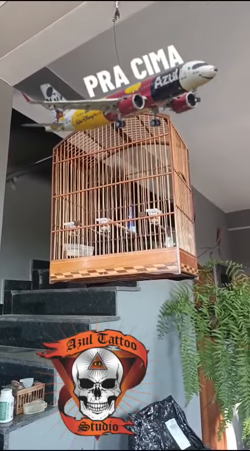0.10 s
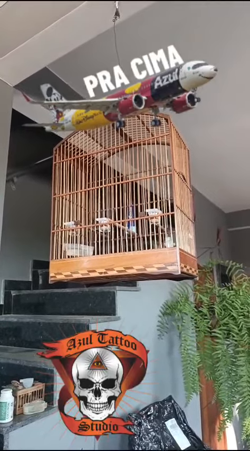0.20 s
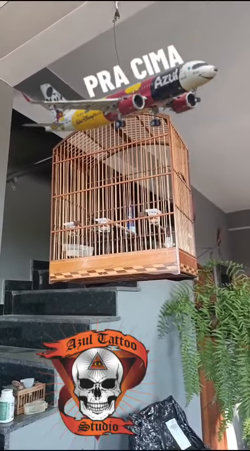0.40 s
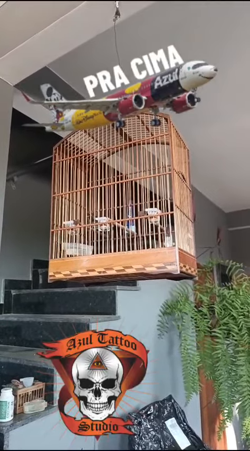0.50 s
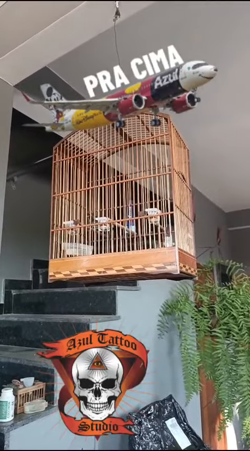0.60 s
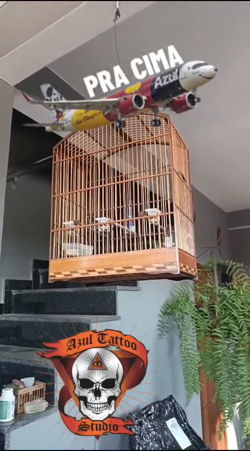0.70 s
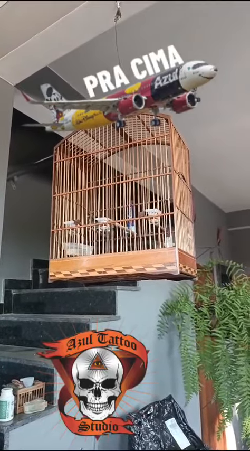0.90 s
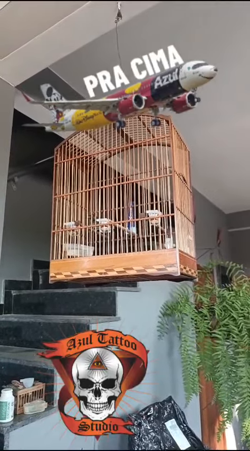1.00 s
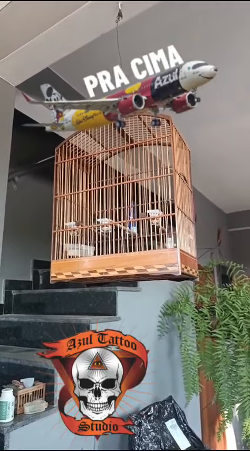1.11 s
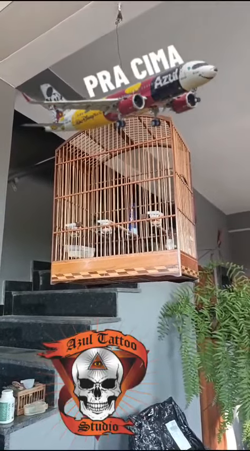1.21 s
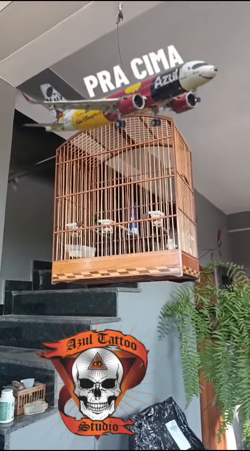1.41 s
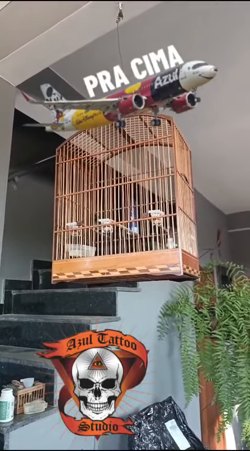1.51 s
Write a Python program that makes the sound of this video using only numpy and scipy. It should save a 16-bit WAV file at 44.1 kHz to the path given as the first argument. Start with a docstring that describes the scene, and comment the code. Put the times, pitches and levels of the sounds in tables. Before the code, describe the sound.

A small caged bird sings close by: thin, very high falling chips from 0 to 0.2 s, a fast two-voiced buzz from 0.22 s narrowing to a whistle near 0.36 s, and a steep drop at 0.40-0.45 s. The hard room rings afterward. Tiny cage taps fall at 0.05 and 0.2 s. Farther birds chirp softly, clearest at 0.7-0.9 s, over low rumble; a faint chip comes at 1.55 s.

```python
"""Indoors, in a hard ringing room with low outdoor rumble: a small caged bird sings near a phone.
Gliding near-sines make thin falling chips, a two-voiced trilled buzz that narrows to a whistle, and a quick drop.
Wall echoes and decaying noise ring after the song; two tiny noise taps sound in the cage.
Other birds, softer gliding notes in the same room, call farther off over filtered-noise air."""
import sys
import numpy as np
from scipy import signal
from scipy.fft import rfft, irfft, next_fast_len
from scipy.io import wavfile
from scipy.ndimage import uniform_filter1d

SR = 44100
rng = np.random.default_rng(int(sys.argv[2]) if len(sys.argv) > 2 else 0)


def voltage_ratio(level):
    """Linear amplitude factor for a level in decibels (scalar or array-like)."""
    return 10 ** (np.asarray(level, float) / 20)


def pcm_store(signal):
    """Save signal as 16-bit PCM."""
    levels = np.round(np.clip(np.atleast_2d(signal), -1, 1) * 32767)
    wavfile.write(sys.argv[1], SR, levels.astype(np.int16).T)


N = 68355
PREROLL = int(.3 * SR)  # samples played before the start, so the room already rings

# outdoor air spectrum, overall level set by AIR_DB: (frequency [Hz], relative density [dB])
AIR_SPECTRUM = [(15, -41), (25, -25), (108, 0.5), (180, -1.5), (335, -9.5), (714, -14.5), (1100, -17),
                (2110, -18.5), (3340, -24), (4600, -29.5), (6200, -38.5), (8000, -43.5), (12000, -47.5),
                (16000, -41)]
# stereo spread of the air: (frequency [Hz], side minus mid [dB])
AIR_SPREAD = [(60, -19), (110, -16.5), (200, -12.5), (380, -6.5), (700, -2.5), (1290, -1), (2380, -0.5),
              (4400, -1), (8120, -0.5), (15000, 0)]
# low hums in the air: (frequency [Hz], width [Hz], lift over the rumble [dB])
AIR_HUMS = [(61, 4.6, 8.5), (92, 5, 4.5), (162, 16, 3)]
AIR_DB, AIR_RISE_DB_PER_S = -50.5, 0.5

# room decay by band: (frequency [Hz], early T60 [s], late T60 [s], late level re early [dB])
ROOM_BANDS = [(2000, 0.69, 1.8, -9.5), (4000, 0.69, 0.97, -9), (6000, 0.47, 0.89, -10),
              (7560, .5, 0.83, -4.5), (11000, 0.3, 0.77, -14.5), (16000, 0.41, 0.6, -5)]
# nearest walls: (delay [s], left gain [dB], right gain [dB])
WALL_ECHOES = [(.007, -11, -13), (.016, -11.5, -11.5), (.021, -11, -13), (.031, -11, -22), (.052, -11, -12),
               (.075, -9, -15)]
FIRST_ECHO_S, BUILD_S = 0.0033, 0.0078
NEAR_WET_DB, FAR_WET_DB, FAR_DIRECT_DB = 5.5, 8.5, -8

# microphone colour on the near sounds: (frequency [Hz], gain [dB])
MIC_COLOUR = [(3000, 5), (6000, -2), (9000, -0.5), (11200, -5.5), (13000, 2.5), (15300, 1.5)]
# balance of the two phone ports on the near sounds: (frequency [Hz], left minus right [dB])
PORT_BALANCE = [(1000, -7), (2000, -13), (4000, -2), (8000, -9.5), (11000, 1), (14000, 3.5)]
LEFT_LEAD_S = 0.00012  # the near direct sound reaches the left port first

# Source levels below are ahead of the room, the ports and any trill or flutter.
# calls farther off: (time [s], length [s], start pitch [Hz], end pitch [Hz], level [dB])
FAR_CALLS = [(-.06, 0.057, 4356, 2794, -57.5), (.02, 0.039, 3090, 3020, -62.5),
             (.04, 0.053, 4300, 3804, -62.5), (.69, 0.041, 5850, 5670, -44.5),
             (.72, 0.061, 5720, 4455, -49), (.745, 0.052, 4387, 3640, -46.5),
             (.775, 0.013, 5500, 4850, -60), (.805, 0.039, 4640, 4000, -52.5),
             (.845, 0.019, 4000, 4000, -50.5), (.88, 0.0885, 2912, 2790, -63), (1.03, .04, 9570, 7680, -79),
             (1.1, 0.092, 6160, 5000, -74.5), (1.15, 0.049, 6980, 6800, -72),
             (1.37, 0.061, 7440, 4600, -74.5), (1.21, .03, 6000, 4890, -59), (1.245, .055, 5400, 3500, -66),
             (1.345, .02, 3750, 3710, -81), (1.43, 0.027, 6750, 5800, -62.5),
             (1.455, .03, 6100, 4810, -63.5), (1.495, 0.051, 3197, 3750, -68.5)]
# taps in the cage: (time [s], level [dB])
CAGE_TICKS = [(.049, -44), (.2, -44)]
# falling chips around the song: (time [s], length [s], start pitch [Hz], end pitch [Hz], level [dB])
CHIP_NOTES = [(-.057, .007, 10840, 8800, -46.5), (-.016, .007, 10810, 9000, -39),
              (.025, 0.0086, 9970, 8860, -40.5), (.066, .007, 11000, 8920, -37),
              (.107, .007, 11890, 8790, -31), (.146, .007, 11000, 8850, -41.5),
              (.206, 0.0081, 12960, 10000, -28.5), (1.545, .007, 10500, 9060, -58.5)]
# upper voice, buzz into whistle: (time [s], pitch [Hz], trill swing [Hz], level [dB])
UPPER_VOICE = [(.223, 9400, 902, -71.5), (.228, 9320, 904, -33.5), (.265, 8920, 1189, -31),
               (.31, 8485, 1292, -34), (.34, 8310, 1391, -30.5), (.355, 7810, 300, -25.5),
               (.375, 7760, 80, -27.5), (.398, 7620, 39.1, -28.5), (.404, 7660, 40, -63.5)]
# lower voice of the buzz: (time [s], pitch [Hz], trill swing [Hz], level [dB])
LOWER_VOICE = [(.223, 6610, 400, -80), (.228, 6770, 400, -41.5), (.265, 7043, 700, -28),
               (.31, 7290, 800, -45), (.336, 7030, 300, -26), (.348, 6840, 300, -59)]
# closing drop: (time [s], pitch [Hz], trill swing [Hz], level [dB])
CLOSING_DROP = [(.401, 7350, 29.93, -55), (.4035, 6920, 594, -22), (.407, 6000, 298, -21.5),
                (.417, 6620, 100, -18.5), (.4205, 6035, 100, -46), (.424, 5790, 150, -20),
                (.43, 5295, 149, -19), (.437, 4603, 150, -19.5), (.442, 4000, 101, -28),
                (.446, 3800, 30, -72.5)]
# octave overtone by part: name: level re fundamental [dB]
OCTAVE_DB = {"upper": -8.5, "lower": -12, "drop": -24.5, "chip": -33}
TRILL_HZ, TRILL_WOBBLE, PULSE_DEPTH_PER_KHZ = 203, 0.044, 0.92  # depth per kHz of trill swing
PITCH_JITTER_HZ, FLUTTER_DB = 59.5, 2.5
SUM_TONE_DB, HALF_TONE_DB = 11, -37


def table(rows, hz):
    """Read (frequency, value) rows on a log-frequency axis."""
    rows = np.array(rows, float)
    return np.interp(np.log(np.maximum(hz, 1)), np.log(rows[:, 0]), rows[:, 1])


def shape(x, gain):
    """Filter by a gain that is a function of frequency."""
    size = next_fast_len(x.shape[-1])
    hz = np.arange(size // 2 + 1) * SR / size
    return irfft(rfft(x, size) * gain(hz), size)[..., :x.shape[-1]]


def clock():
    """Time in s, negative through the preroll."""
    return (np.arange(N + PREROLL) - PREROLL) / SR


def walk(rate):
    """Random drift: levels held 1 / rate s, then smoothed twice."""
    hold, size = max(int(SR / rate), 1), N + PREROLL
    steps = np.repeat(rng.standard_normal(size // hold + 1), hold)[:size]
    return 1.3 * uniform_filter1d(uniform_filter1d(steps, hold), hold)


def whistle(hz, level, octave_db, half_db=-99):
    """A near sine with an octave overtone and an optional tone an octave below."""
    phase = 2 * np.pi * np.cumsum(hz) / SR + 2 * np.pi * rng.random()
    octave = voltage_ratio(octave_db) * np.sin(2 * phase) * (2 * hz < .45 * SR)  # mute it close to Nyquist
    half = voltage_ratio(half_db) * np.sin(phase / 2)
    return np.sqrt(2) * level * (np.sin(phase) + octave + half)


def notes(rows, bend, swell, octave_db, warble_hz):
    """Short gliding notes with rounded ends; bend over 1 glides fastest at first, swell over 1 leans late."""
    t, out, warble = clock(), 0, warble_hz * walk(150)
    for start, length, start_hz, end_hz, db in rows:
        u = np.clip((t - start) / length, 0, 1)
        hz = end_hz + (start_hz - end_hz) * (1 - u) ** bend + warble
        envelope = np.minimum(2 * np.sin(np.pi * u ** swell), 1)
        out = out + whistle(hz, voltage_ratio(db) * envelope, octave_db)
    return out


def air():
    """Outdoor rumble, hums and hiss: slowly swelling noise, mostly shared by both ports in the bass."""
    def colour(hz):
        hums = sum(db * np.exp(-((hz - f) / width) ** 2) for f, width, db in AIR_HUMS)
        return table(AIR_SPECTRUM, hz) + hums

    mid = shape(rng.standard_normal(N), lambda hz: voltage_ratio(colour(hz)))
    side = shape(rng.standard_normal(N), lambda hz: voltage_ratio(colour(hz) + table(AIR_SPREAD, hz)))
    rise_db = np.arange(N) / SR * AIR_RISE_DB_PER_S
    level = voltage_ratio(AIR_DB + rise_db + walk(2.8)[:N]) / np.std(mid)
    return level * np.array([mid + side, mid - side])


def room(x, wet_db):
    """Dense echoes, different at each port; each band fades fast at first, then slowly."""
    t, tail = np.arange(N) / SR, 0
    centres = np.array(ROOM_BANDS)[:, 0]
    noise = rng.standard_normal((2, N))
    for k, (_, early_s, late_s, late_db) in enumerate(ROOM_BANDS):
        only_this = np.arange(len(centres)) == k
        band = shape(noise, lambda f: np.sqrt(table(np.c_[centres, only_this], f)))
        tail = tail + band * np.hypot(voltage_ratio(-60 * t / early_s), voltage_ratio(late_db - 60 * t / late_s))
    tail = tail * np.clip((t - FIRST_ECHO_S) / BUILD_S, 0, 1)
    tail *= voltage_ratio(wet_db) / np.sqrt(np.sum(tail ** 2) / 2)  # wet level sets the mean energy of the two tails
    return signal.fftconvolve(x[None], tail, axes=1)[:, :len(x)]


def walls(x):
    """Single delayed echoes off the nearest walls."""
    out = 0
    for delay, left_db, right_db in WALL_ECHOES:
        gain = voltage_ratio(np.array([[left_db], [right_db]]))
        out = out + gain * np.roll(x, int(delay * SR)) * (clock() > delay - .3)  # gate the wrapped end
    return out


def far_birds():
    """Softer, evenly gliding calls with a random warble, direct and through the room."""
    calls = notes(FAR_CALLS, bend=1, swell=1, octave_db=-33, warble_hz=110)
    return voltage_ratio(FAR_DIRECT_DB) * calls + room(calls, FAR_WET_DB)


def ticks():
    """Tiny taps in the cage: noise bursts that die at once, thinned in the bass."""
    t, t60_s = clock(), 0.033
    env = sum(voltage_ratio(db - 60 * np.clip(t - s, 0, 1) / t60_s) * (t > s) for s, db in CAGE_TICKS)
    return shape(env * rng.standard_normal(len(t)), lambda hz: np.clip(hz / 1500, 0, 1))


def voice(rows, trill, octave_db, half_db=-99):
    """One side of the syrinx: the trill swings the pitch and pulses the level, loudest as pitch climbs."""
    t, rows = clock(), np.array(rows, float)
    hz, swing_hz, db = (np.interp(t, rows[:, 0], rows[:, k]) for k in (1, 2, 3))
    depth = np.clip(PULSE_DEPTH_PER_KHZ * swing_hz / 1000, 0, 1)
    sounding = (t > rows[0, 0]) * (t < rows[-1, 0])
    level = voltage_ratio(db + FLUTTER_DB * walk(500)) * sounding * (1 + depth * np.cos(trill))
    pitch = hz + swing_hz * np.sin(trill) + PITCH_JITTER_HZ * walk(400)
    return whistle(pitch, level, octave_db, half_db)


def bird():
    """Chips, buzz, whistle and drop; the two voices of the buzz multiply into a sum tone."""
    trill = 2 * np.pi * np.cumsum(TRILL_HZ * (1 + TRILL_WOBBLE * walk(60))) / SR
    upper = voice(UPPER_VOICE, trill, OCTAVE_DB["upper"], HALF_TONE_DB)
    lower = voice(LOWER_VOICE, trill + 1.3, OCTAVE_DB["lower"])
    sum_tone = shape(upper * lower, lambda hz: (hz > 11000) * (hz < 19000))
    chips = notes(CHIP_NOTES, bend=2.6, swell=1.3, octave_db=OCTAVE_DB["chip"], warble_hz=20)
    drop = voice(CLOSING_DROP, trill, OCTAVE_DB["drop"])
    return chips + upper + lower + voltage_ratio(SUM_TONE_DB) * sum_tone + drop


def at_ports(near):
    """Direct sound, wall echoes and room tail of the near sounds, coloured by the two phone ports."""
    left = shape(near, lambda hz: np.exp(2j * np.pi * hz * LEFT_LEAD_S))
    heard = np.array([left, near]) + walls(near) + room(near, NEAR_WET_DB)

    def port_gain(hz):
        balance_db = np.outer([.5, -.5], table(PORT_BALANCE, hz))
        return voltage_ratio(table(MIC_COLOUR, hz) + balance_db)

    return shape(heard, port_gain)


def scene():
    """Near bird, taps and far birds in the room, over the air."""
    birds = at_ports(bird() + ticks()) + far_birds()
    return birds[:, PREROLL:] + air()


def roll_off(x):
    """The treble ends steeply here."""
    return signal.sosfilt(signal.butter(12, 16480, fs=SR, output="sos"), x)


def record(dry):
    """The phone cuts the top steeply, 70 dB down from 16250 Hz."""
    top_cut = signal.cheby2(20, 70, 16250, fs=SR, output="sos")
    mix = signal.sosfilt(top_cut, dry)
    return roll_off(mix)


dry = scene()
out = record(dry)
pcm_store(out)
```